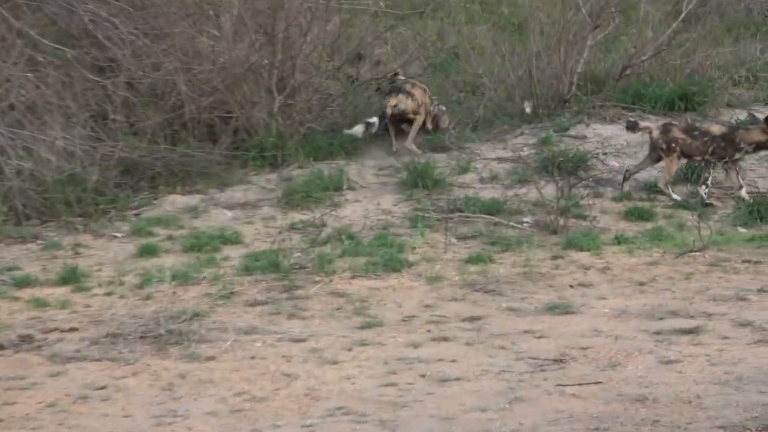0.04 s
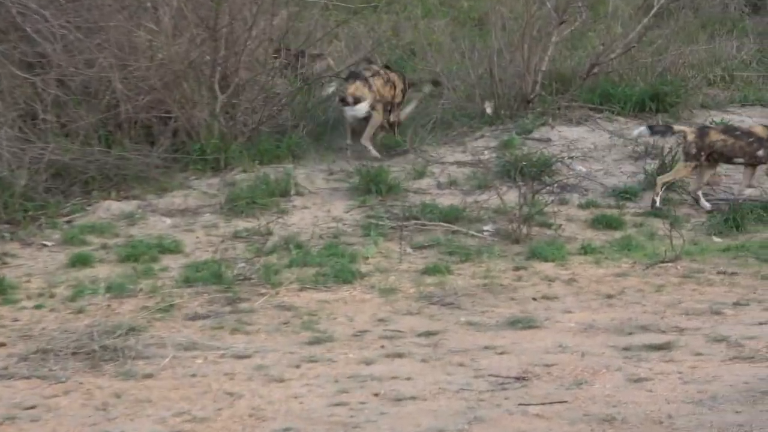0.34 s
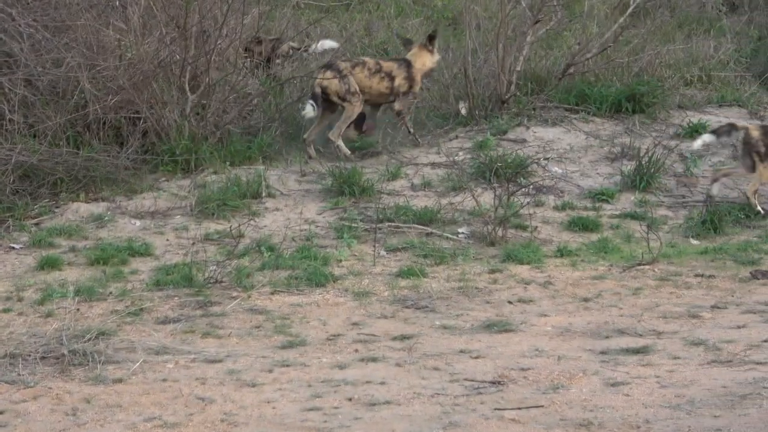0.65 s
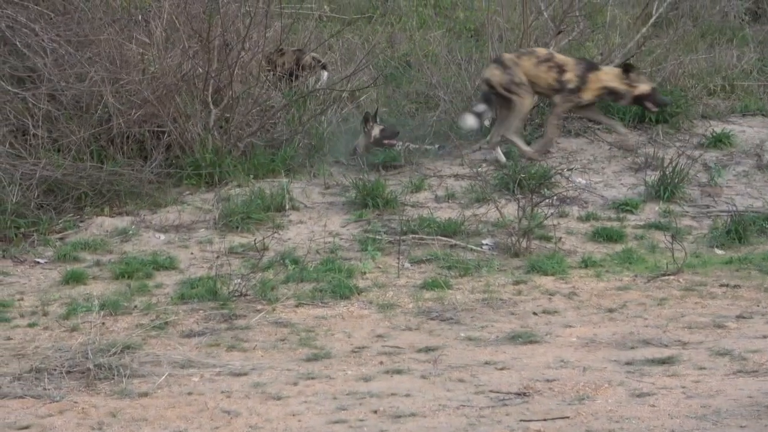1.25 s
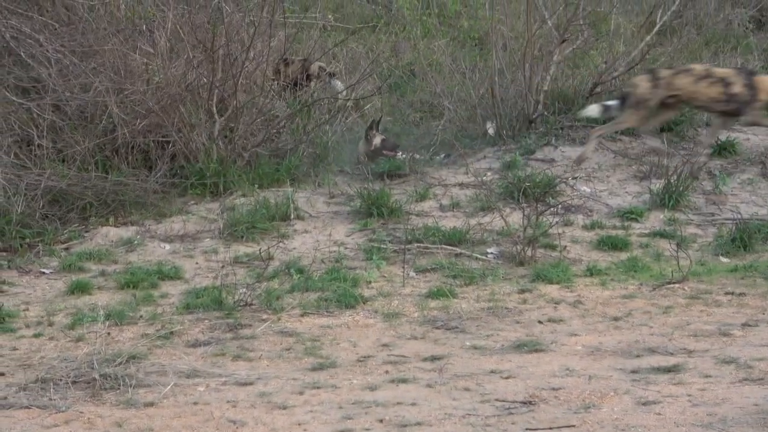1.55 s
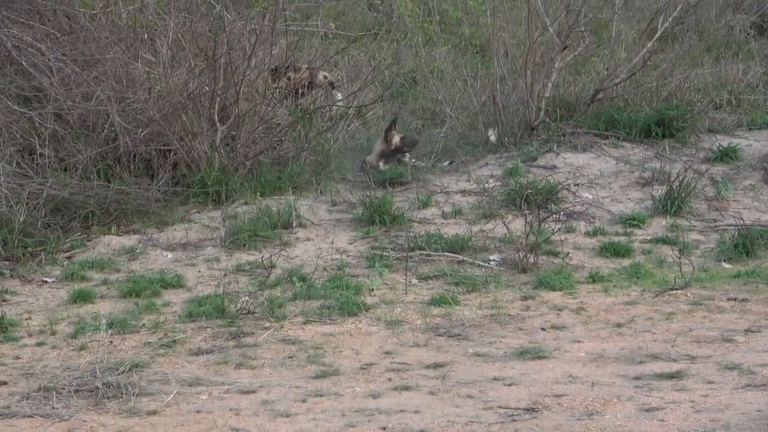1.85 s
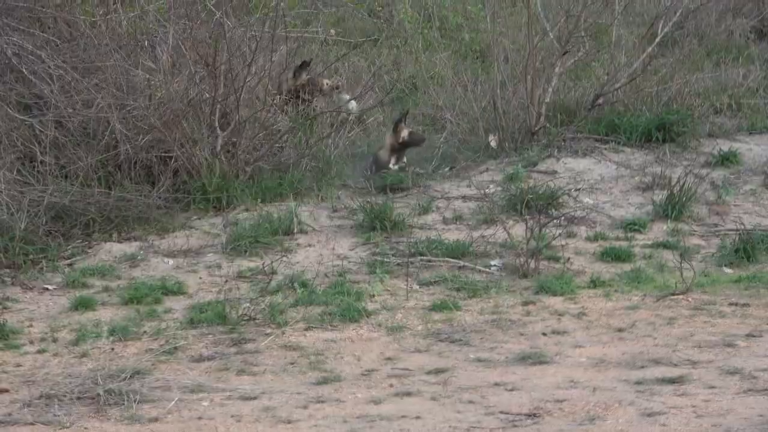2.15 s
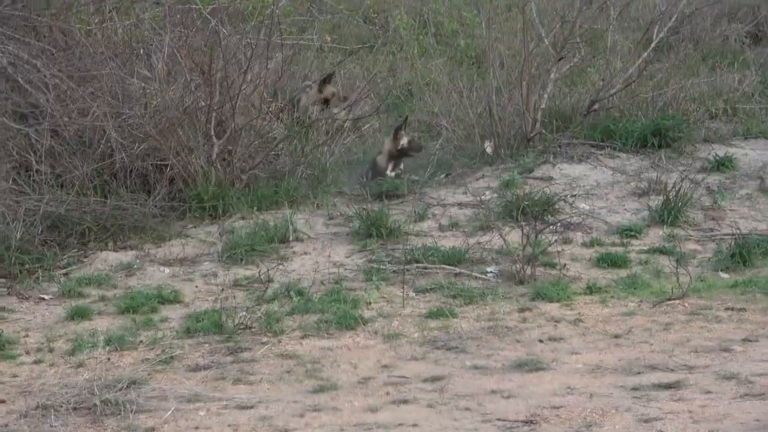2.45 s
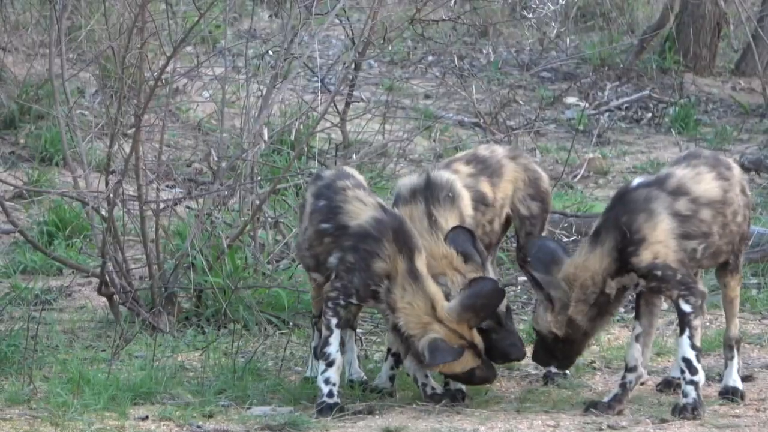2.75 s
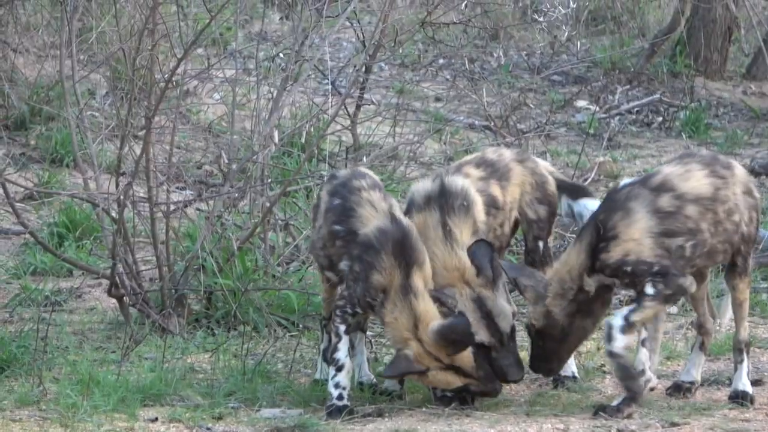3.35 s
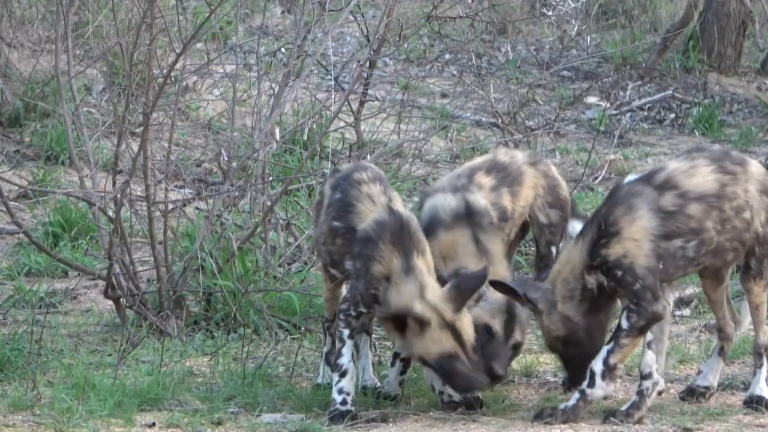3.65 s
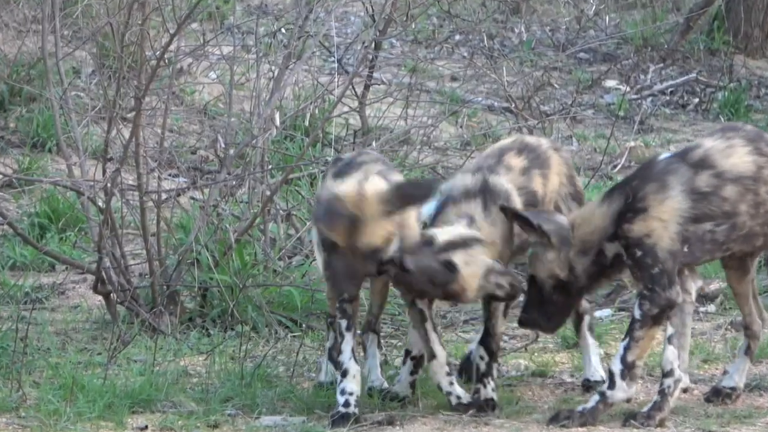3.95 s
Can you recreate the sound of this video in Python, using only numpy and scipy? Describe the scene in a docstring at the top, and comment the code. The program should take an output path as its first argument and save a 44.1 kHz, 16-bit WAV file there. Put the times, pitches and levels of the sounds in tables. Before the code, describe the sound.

High whines, squeaks and twitters of wild dogs, with faint birds and a low rumble.

```python
"""Wild dogs in dry bush open with whistled whines near 2 kHz and a second, much higher voice that squeaks
in quick arches; thickets scatter every call, over a low rumble. A foot thuds on sand at 0.9 s. From 1.8 s
the dogs twitter and whimper, birds whistle far off, a gust buffets the microphone and two twigs snap.
At about 2.5 s the scene changes abruptly to a quieter spot with insects and birds, and a thin double
squeak comes near the end."""
import sys
import numpy as np
from scipy import signal
from scipy.fft import rfft, irfft
from scipy.io import wavfile

SR = 44100
rng = np.random.default_rng(int(sys.argv[2]) if len(sys.argv) > 2 else 0)


def generate_wav(signal):
    """Clip the signal to [-1, 1] and save it as 16-bit WAV at the path in sys.argv[1]."""
    frames = np.transpose(np.atleast_2d(signal))
    scaled = np.clip(frames, -1, 1) * 32767
    pcm = np.round(scaled).astype(np.int16)
    wavfile.write(sys.argv[1], SR, pcm)


N = 176400
T = np.arange(N) / SR
CUT_S = 2.548  # change of place
FLUTTER_HZ, GRIT_HZ = 296.7, 899  # rates of random modulation in the voices

# whines, one list a call (time [s], pitch [Hz], fundamental [dB], second harmonic [dB])
WHINES = [
    [(0, 2110, -8, -23), (.027, 2429, -13.5, -27.5), (.042, 2270, -9.5, -27), (.056, 2570, -14, -38.5),
     (.071, 2050, -24.5, -26.5), (.086, 1670, -42, -53)],
    [(.074, 2413, -17, -45), (.094, 2578, -22, -59), (.108, 2430, -20, -44), (.125, 1870, -50, -41)],
    [(.221, 2450, -20, -33.5), (.241, 2271, -13.5, -33), (.247, 1958, -34, -38), (.272, 1814, -29.5, -36),
     (.287, 2040, -23.5, -34.5), (.322, 1851, -30.5, -50), (.372, 2057, -41, -50), (.405, 1720, -38, -45)],
    [(.41, 1693, -34, -43), (.426, 1989, -26, -29), (.447, 2154, -18.5, -20.5), (.455, 2171, -12, -31),
     (.48, 2177, -13.5, -22), (.502, 2155, -10.5, -35.5), (.512, 2138, -22, -23),
     (.524, 2144, -28.5, -23.5), (.535, 2004, -25, -33), (.57, 2010, -39, -43), (.60, 1900, -37, -43),
     (.62, 1996, -29, -33.5), (.65, 1900, -34.5, -41), (.67, 1450, -55, -44)],
    [(.655, 2040, -30.5, -32.5), (.675, 2030, -36.5, -42), (.70, 1910, -54, -72)],
    [(.87, 1902, -30.5, -46), (.884, 1247, -43, -36.5), (.893, 880, -47, -39)],
    [(.89, 4750, -37.5, -52), (.899, 3950, -43.5, -44), (.914, 3760, -35, -53)],
]
# envelope of the rasp in the voice (time [s], level [dB])
RASP_ENVELOPE = [(.06, -45), (.3, -49.5), (.65, -56)]
# spectrum of the rasp (frequency [Hz], relative level [dB])
RASP_SPECTRUM = [(600, -13.5), (1400, -5.5), (6000, -4), (12000, -6.5), (15000, -14.5)]
def whines(jitter=0.0071, shimmer_db=0.88, edge_s=0.0025, grit_rad=0.295):
    """Harmonic series: five partials with jitter in pitch, shimmer in level and a noisy rasp."""
    fundamental, overtones = np.zeros((2, 2, N))
    rasp = envelope(RASP_ENVELOPE) * noise(RASP_SPECTRUM)
    for call in WHINES:
        times, hz, first_db, second_db = np.array(call).T
        on = (T >= times[0]) & (T <= times[-1])
        t = T[on]
        pitch = np.interp(t, times, hz) * (1 + jitter * walk(FLUTTER_HZ)[on])
        phase = phase_of(pitch)
        fade = np.clip(np.minimum(t - times[0], times[-1] - t) / edge_s, 0, 1)
        gain = np.sqrt(2) * fade * undb(shimmer_db * walk(FLUTTER_HZ)[on])
        first_gain = gain * undb(np.interp(t, times, first_db))
        second_gain = gain * undb(np.interp(t, times, second_db) + 2 * walk(FLUTTER_HZ)[on])
        rough_phase = phase + grit_rad * walk(FLUTTER_HZ)[on]
        second = pan(second_gain * np.sin(2 * rough_phase), 4)
        upper = sum(undb(db) * np.sin(k * rough_phase) for k, db in [(3, -8), (4, -26.5), (5, -29)])
        fundamental[:, on] += pan(first_gain * np.sin(phase), 2.5)
        overtones[:, on] += second + second_gain * upper + gain * rasp[on]
    return head_turn(fundamental) + head_turn(overtones)


# the dog turns its head (time [s], scattered over direct level [dB])
FACING = [(.02, -10), (.09, -5), (.24, -9), (.26, 4), (.38, -4), (.42, -10), (.505, -9), (.53, 5),
          (.67, -3.5)]
def head_turn(voice):
    """Directivity: a dog facing away is heard mostly by way of the thicket."""
    scatter_ratio = envelope(FACING)
    direct = voice / np.hypot(1, scatter_ratio)
    return direct + thicket(direct * scatter_ratio)


# close squeaks (start [s], length [s], first pitch [Hz], middle pitch [Hz], last pitch [Hz], level [dB])
SQUEAKS = [(.073, .01, 13300, 11540, 9800, -36.5), (.16, 0.04, 6050, 7500, 8600, -46.5),
           (.197, 0.021, 6440, 5330, 7800, -37.5), (.203, 0.037, 11100, 10750, 12900, -44.5),
           (.236, 0.018, 9760, 7850, 7200, -39.5), (.308, 0.018, 8800, 7200, 6200, -43),
           (.322, 0.02, 11160, 11100, 11800, -42), (.34, 0.015, 6260, 8500, 9200, -44.5),
           (.39, 0.02, 9000, 7100, 7400, -43), (.712, 0.029, 4900, 5760, 6250, -48.5),
           (.845, 0.0113, 5600, 5600, 6040, -37), (.853, .012, 6080, 7660, 9300, -30),
           (.864, 0.026, 9100, 9950, 6430, -44.5), (3.655, 0.033, 7200, 7570, 8770, -51.5),
           (3.712, 0.029, 9200, 5800, 4880, -55)]
def squeaks():
    """Frequency modulation: the high voice sweeps quickly, roughened by random jitter."""
    voice = arches(SQUEAKS, overtone_db=-23, jitter=0.031, shimmer_db=3.5)
    return outdoors(pan(voice, 0.5), wet_db=-5)


# far twitter (start [s], length [s], first, middle and last pitch [Hz], level before filtering [dB])
TWITTER = [(1.8, 0.011, 7700, 10550, 12500, -56.5), (1.877, 0.045, 5290, 8960, 6240, -50),
           (1.946, 0.046, 5110, 8850, 5920, -49.5), (2.024, 0.036, 5650, 7800, 6750, -51.5),
           (2.1, 0.039, 5600, 8220, 6350, -51), (2.43, 0.012, 4330, 5180, 6250, -61),
           (2.444, 0.03, 6310, 7550, 5600, -60)]
# its filter, peaking at 5 and 12 kHz (frequency [Hz], gain [dB])
TWITTER_FILTER = [(3000, 8.5), (5000, 14.5), (6500, 8.5), (9000, 1.5), (12000, 11), (15000, -14)]
def twitter(beat_hz=4300, depth_db=-15.5):
    """Amplitude modulation: a dog's low voice beats against its high one, adding sidebands."""
    voice = arches(TWITTER, overtone_db=-5, jitter=0.03, shimmer_db=-5)
    beat = np.sin(phase_of(beat_hz * (1 + 0.0336 * walk(GRIT_HZ))))
    modulated = voice * (1 + undb(depth_db) * beat)
    filtered = irfft(rfft(modulated) * bin_gains(TWITTER_FILTER), N)
    return outdoors(pan(filtered, -1.5), wet_db=4.5, t60_s=0.43)


# whimpers (start [s], length [s], first, middle and last pitch [Hz], level [dB])
WHIMPERS = [(1.888, 0.029, 2040, 2100, 1970, -41.5), (1.946, 0.048, 1984, 2073, 2087, -38),
            (2.02, 0.034, 1930, 2050, 2120, -44.5), (2.11, 0.044, 2132, 2092, 2056, -43),
            (2.448, 0.05, 1780, 2026, 1830, -47.5)]
def whimpers():
    """Nearly periodic voicing: soft notes near 2 kHz with a weak octave."""
    voice = arches(WHIMPERS, overtone_db=-13, jitter=0.0054, shimmer_db=-0.5)
    return outdoors(pan(voice, 1), wet_db=-4)


# spectrum of the thud (frequency [Hz], relative level [dB])
STEP_SPECTRUM = [(100, -15), (380, 0.5), (650, -10.5), (1200, -12), (5000, -50)]
def footfall():
    """Damped impact: a dull thud on sand, to the left."""
    return pan(noise(STEP_SPECTRUM) * decay(start_s=0.904, db=-38, tau_s=0.02), 7.7)


# twig snaps (time [s], level [dB])
SNAPS = [(2.243, -47), (2.325, -43.5)]
# their spectrum (frequency [Hz], relative level [dB])
SNAP_SPECTRUM = [(1000, -8), (3500, -5.5), (7000, -1.5), (15000, -17)]
def snaps():
    """Brittle fracture: dry twigs crack underfoot in broadband bursts."""
    return noise(SNAP_SPECTRUM) * sum(decay(start, db, tau_s=0.018) for start, db in SNAPS)


# thin whistles (start [s], length [s], first, middle and last pitch [Hz], level [dB])
BIRDS = [(.745, 0.055, 6350, 6540, 6335, -44.5), (1.515, 0.025, 5030, 5100, 5100, -60),
         (1.79, 0.12, 6650, 6170, 5880, -62), (1.875, 0.091, 5830, 5450, 4670, -52),
         (1.915, 0.024, 3460, 3400, 3200, -57), (2.085, 0.1, 4890, 4790, 4980, -52.5),
         (2.17, .07, 5600, 5330, 4680, -60), (2.25, 0.12, 4150, 3540, 3010, -64.5),
         (2.34, 0.13, 6670, 5700, 4730, -61), (2.465, 0.032, 4160, 3800, 3370, -58),
         (2.82, 0.13, 5120, 4490, 2980, -67.5), (3.16, 0.074, 2696, 2654, 2420, -70),
         (3.62, 0.14, 2745, 2630, 2570, -68.5)]
def birds(wet_db=-3.5):
    """Almost pure tones: distant birds glide in pitch, heard directly and by scattering."""
    song = pan(arches(BIRDS, overtone_db=-38.5, jitter=0.0047, shimmer_db=6.5), 0)
    return song + undb(wet_db) * thicket(song)


# insect drone (frequency [Hz], level [dB])
INSECTS = [(5518, -74.5), (5755, -79), (5997, -78)]
def insects(jitter=0.0029):
    """Line broadening: slight frequency jitter roughens thin, steady tones."""
    return sum(np.sqrt(2) * undb(db) * np.sin(phase_of(hz * (1 + jitter * walk(450))))
               for hz, db in INSECTS)


# envelope of the gust (time [s], level [dB])
GUST_ENVELOPE = [(1.92, -64), (1.97, -33), (2.08, -37), (2.2, -56), (2.31, -39.5), (2.5, -52)]
# its spectrum (frequency [Hz], relative level [dB])
GUST_SPECTRUM = [(15, 2), (36, -8), (60, -14.5), (150, -33.5), (600, -70.5)]
def gust():
    """Turbulence: wind on the microphone makes low-frequency pressure fluctuations."""
    return noise(GUST_SPECTRUM) * envelope(GUST_ENVELOPE)


# mid and side spectra of the air in the bush (frequency [Hz], relative level [dB])
BUSH_MID = [(25, 4.5), (60, 0.5), (85, -5), (220, -9.5), (550, -16.5), (1200, -22), (1700, -19.5),
            (5200, -32.5), (15500, -38)]
BUSH_SIDE = [(40, -13), (250, -10), (1200, -19), (1700, -10.5), (9900, -28), (15500, -47)]
# balance of the mid part (frequency [Hz], left minus right [dB])
BUSH_BALANCE = [(60, -2), (200, 5), (380, 10.5), (2400, 10.5), (8100, 0)]
def bush_air():
    """Partly coherent noise: rumble and hiss whose midrange leans to the left."""
    ratio = bin_gains(BUSH_BALANCE)
    balance = 2 * np.array([ratio, np.ones_like(ratio)]) / (1 + ratio)
    mid = irfft(rfft(noise(BUSH_MID)) * balance, N)
    return mid_side(mid * undb(-43), noise(BUSH_SIDE) * undb(-58.5))


# mid and side spectra of the air in the clearing (frequency [Hz], relative level [dB])
CLEARING_MID = [(25, -1), (55, -2), (76, -8.5), (100, -19), (160, -21), (500, -30), (1000, -32),
                (2400, -33.5), (3200, -40.5), (5500, -42.5), (9000, -46.5), (15500, -54)]
CLEARING_SIDE = [(40, -10.5), (300, -29), (1000, -28.5), (5700, -28), (15500, -47)]
def clearing_air():
    """Stationary noise: the fainter rumble and hiss of the second place."""
    return mid_side(noise(CLEARING_MID) * undb(-46), noise(CLEARING_SIDE) * undb(-61.5))


def thicket(x, t60_s=0.3, build_s=0.0076, spread_db=6.5, width=0.058):
    """Scattering: fast-fading echoes, weak from twigs and stronger from trunks, alike on both sides."""
    t = T[:SR]
    echoes = rng.standard_normal((2, SR)) * undb(spread_db * walk(500)[:SR])
    response = echoes * (1 - np.exp(-t / build_s)) * undb(-60 * t / t60_s)
    mid, side = response / np.sqrt(np.sum(response ** 2, axis=1, keepdims=True))
    return signal.fftconvolve(x, mid_side(mid, width * side), axes=1)[:, :N]


def outdoors(x, wet_db, t60_s=0.3):
    """Reverberation: direct sound plus scatter, which is 9 dB weaker in the clearing."""
    in_bush = T < CUT_S
    bush = in_bush * thicket(x * in_bush, t60_s)
    clearing = undb(-9) * thicket(x * ~in_bush, t60_s)
    return x + undb(wet_db) * (bush + clearing)


def arches(notes, overtone_db, jitter, shimmer_db, edge_share=0.2):
    """Glides: wavering notes of two harmonics whose pitch follows a parabola."""
    out = np.zeros(N)
    waver = 1 + jitter * walk(GRIT_HZ)
    shimmer = undb(shimmer_db * walk(FLUTTER_HZ))
    for start, length, *pitches, db in notes:
        on = (T >= start) & (T < start + length)
        progress = (T[on] - start) / length
        hz = np.polyval(np.polyfit([0, .5, 1], pitches, 2), progress)
        phase = phase_of(hz * waver[on])
        swell = np.sin(np.pi / 2 * np.clip(np.minimum(progress, 1 - progress) / edge_share, 0, 1))
        overtone = undb(overtone_db) * np.sin(2 * phase) * (2 * hz < SR / 2)
        out[on] += np.sqrt(2) * undb(db) * swell * (np.sin(phase) + overtone)
    return out * shimmer


def undb(db):
    """Decibels to amplitude ratio."""
    return 10 ** (np.asarray(db) / 20)


def phase_of(hz):
    """Phase as the integral of frequency."""
    return 2 * np.pi * np.cumsum(hz) / SR


def envelope(points):
    """Interpolation of (time [s], level [dB]) points, as gains."""
    return undb(np.interp(T, *np.array(points).T))


def decay(start_s, db, tau_s):
    """Exponential decay after a sudden onset."""
    return undb(db) * (T >= start_s) * np.exp(-np.abs(T - start_s) / tau_s)


def pan(x, db):
    """Localisation by level difference, left minus right."""
    ratio = undb(db)
    return np.array([[2 * ratio], [2]]) / (1 + ratio) * x


def mid_side(mid, side):
    """Sum and difference give left and right."""
    return mid + np.array([[1], [-1]]) * side


def walk(hz):
    """Random modulation: interpolated Gaussian values with a spread near 1."""
    return np.interp(T * hz, np.arange(8000), rng.standard_normal(8000))


def bin_gains(points):
    """Frequency response through (frequency [Hz], level [dB]) points on a logarithmic axis."""
    hz, db = np.array(points).T
    return undb(np.interp(np.log(np.fft.rfftfreq(N, 1 / SR) + 1e-9), np.log(hz), db))


def noise(spectrum):
    """Spectral shaping: coloured noise of rms 1."""
    x = irfft(rfft(rng.standard_normal(N)) * bin_gains(spectrum), N)
    return x / x.std()


def scene():
    """Superposition: dogs, a footfall, twigs and birds over the background of each place."""
    dogs = whines() + squeaks() + twitter() + whimpers()
    background = np.where(T < CUT_S, bush_air() + gust(), clearing_air() + insects())
    return dogs + footfall() + snaps() + birds() + background


def record(dry):
    """Band limiting: a steep low-pass filter removes the top of the treble."""
    return signal.sosfilt(signal.ellip(10, .2, 80, 15750, fs=SR, output="sos"), dry)


dry = scene()
out = record(dry)
generate_wav(out)
```